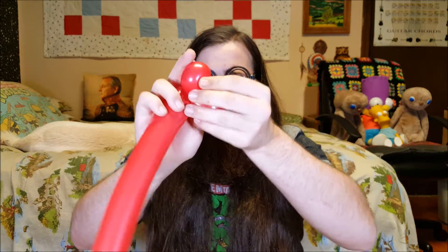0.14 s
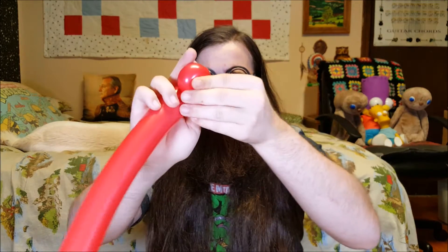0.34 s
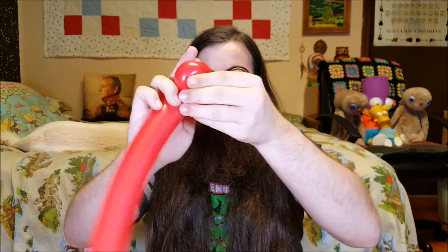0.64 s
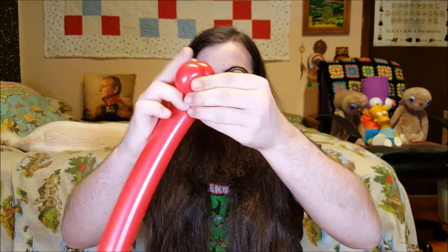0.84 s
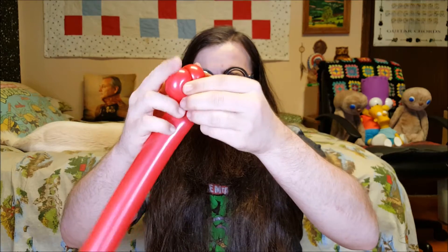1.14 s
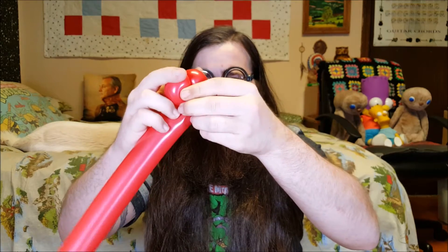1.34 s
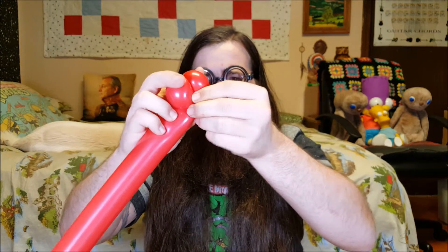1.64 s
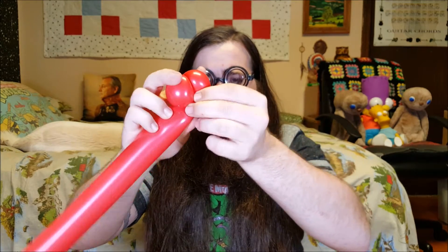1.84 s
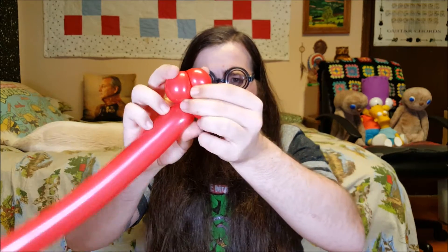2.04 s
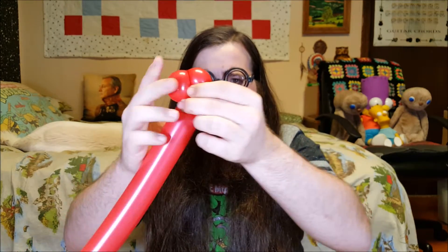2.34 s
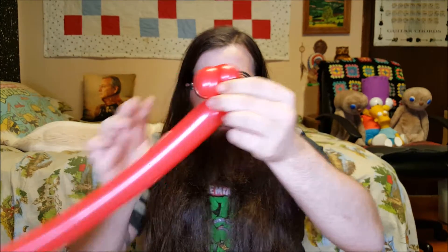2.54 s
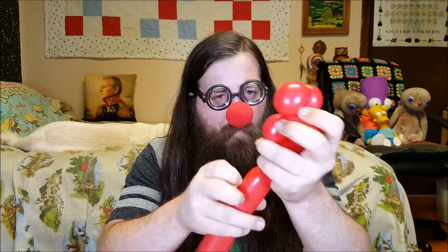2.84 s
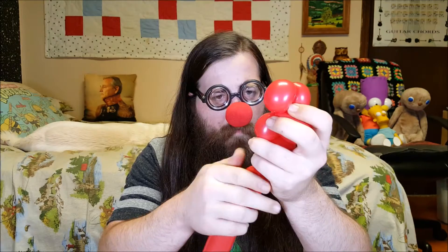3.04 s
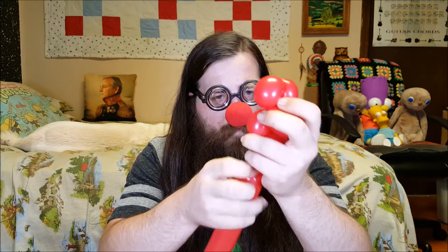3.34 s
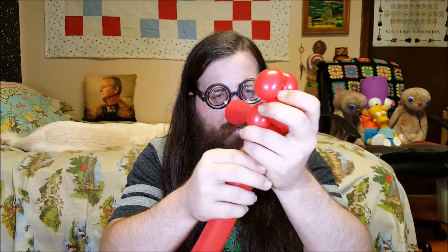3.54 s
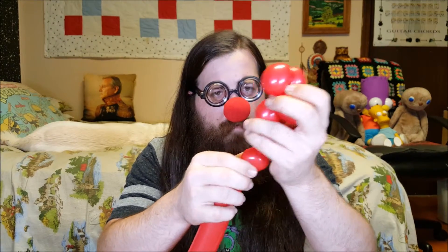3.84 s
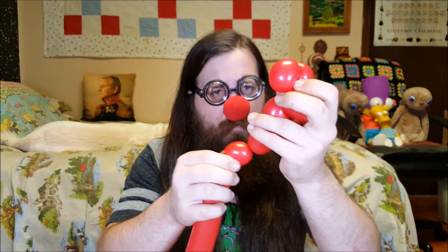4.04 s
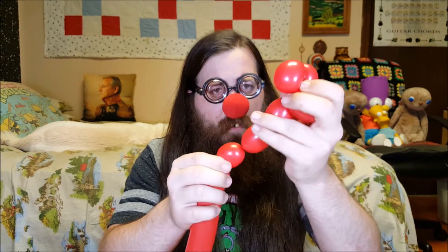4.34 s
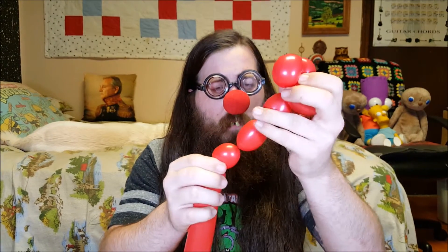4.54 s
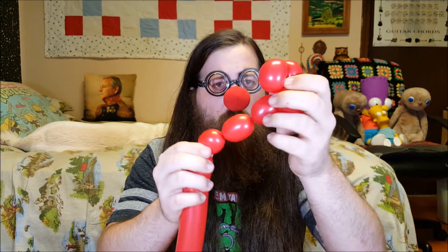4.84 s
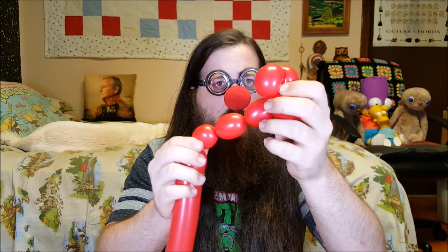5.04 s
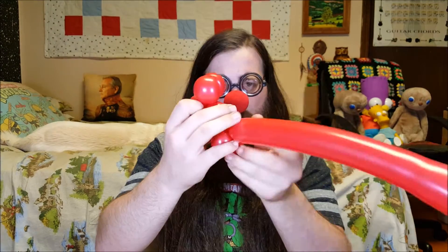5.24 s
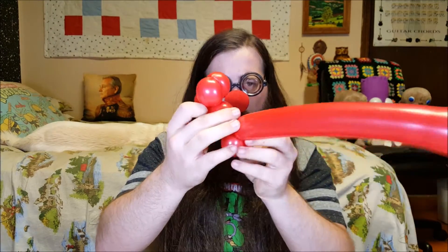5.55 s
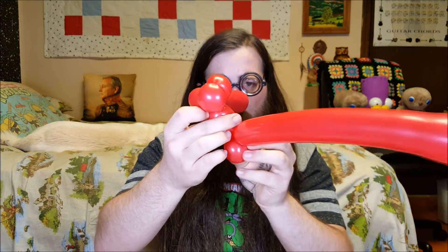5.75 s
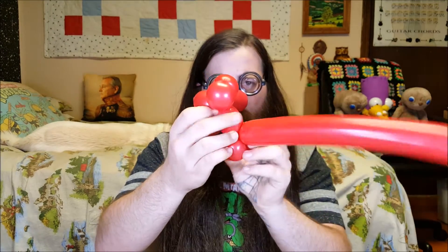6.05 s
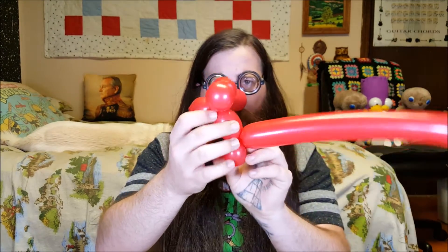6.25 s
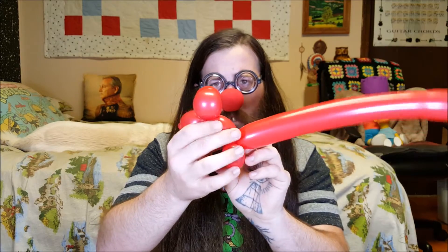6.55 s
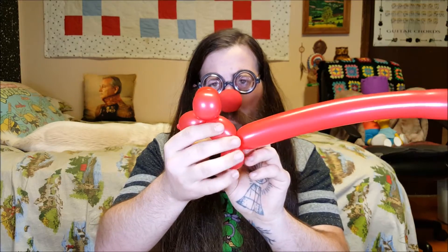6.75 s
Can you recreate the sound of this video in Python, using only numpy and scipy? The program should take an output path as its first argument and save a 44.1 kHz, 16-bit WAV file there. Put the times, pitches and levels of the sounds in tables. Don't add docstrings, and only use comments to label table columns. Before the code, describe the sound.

Close stereo sound of hands twisting a long inflated balloon in a small, soft-furnished room. Grainy rubber rubbing and creaks come in short strokes, dotted with sharp clicks. A loud hollow pop lands before two seconds, then the hands nearly fall silent. Quick clusters of snaps follow as more sections are twisted, then lighter squeaky rubs and ticks as they are folded together.

```python
import sys
import numpy as np
from scipy import signal
from scipy.fft import rfft, irfft
from scipy.io import wavfile
from scipy.ndimage import uniform_filter1d

SR = 44100
rng = np.random.default_rng(int(sys.argv[2]) if len(sys.argv) > 2 else 0)


def invert_db(level):
    return 10 ** (np.asarray(level, dtype=float) / 20)


def to_wav(sig):
    pcm = np.clip(np.atleast_2d(sig), -1, 1) * 32767
    pcm = np.round(pcm).astype(np.int16)
    wavfile.write(sys.argv[1], SR, pcm.T)


N = 303408

# frequency_hz, density_db
AIR = [(18, -39.5), (30, -31.5), (43, -38), (118, -14), (134, 4.5), (1280, -17), (1670, -31),
       (16000, -23.5)]
AIR_DB = -74
# frequency_hz, t60_s
ROOM_T60 = [(250, 0.2), (4000, 0.24), (11000, 0.16)]
ROOM_DB = -8
# frequency_hz, likeness (0 to 1)
LIKENESS = [(100, 1), (1500, 0.8), (4000, 0.38), (12000, 0.029)]
# time_s, delay_samples
RIGHT_LATE = [
    (2.4, 4),
    (2.7, 0),
]

# start_s, level_db, pitch_hz
THUMPS = [(0.514, -52, 320), (4.846, -54, 282), (4.768, -54, 290), (4.79, -55, 290), (4.82, -55, 290),
          (4.962, -54, 290), (1.805, -53, 488), (1.819, -49, 503), (2.107, -41, 393), (2.212, -46, 280),
          (2.281, -49.5, 156), (2.851, -42.5, 326), (3.406, -44, 450), (3.465, -42.5, 470),
          (3.506, -39.5, 437), (3.967, -41.5, 400), (3.994, -42.5, 378), (4.027, -47, 380),
          (4.103, -45.5, 370), (4.237, -43.5, 393), (4.419, -48, 221), (4.442, -48, 200), (4.556, -45, 192),
          (4.586, -48.5, 188), (5.488, -39, 354), (6.081, -48, 475), (6.109, -47, 356), (6.519, -53, 337),
          (6.754, -41, 432), (6.7745, -38, 463), (6.806, -41, 480)]
# start_s, level_db, pitch_hz, t60_s
RINGS = [(.048, -42, 870, .3), (1.65, -46, 3300, .1), (3.176, -46, 1000, .1), (3.68, -42, 780, .2),
         (3.735, -41, 760, .2), (4.38, -52, 800, .2), (4.79, -50, 720, .25), (4.846, -50, 720, .22),
         (4.846, -54, 1480, .12), (5.571, -47, 3900, .1), (6.522, -38, 2600, .1), (6.64, -39, 900, .06)]

# peak_s, level_db, swell_s (per 10 dB), pocket_hz
NOSE_ROLLS = [(0.074, -42, 0.11, 855), (.17, -48, 0.18, 1060), (.25, -46.5, 0.06, 1550),
              (.418, -42.5, 0.19, 1120), (0.52, -37, 0.01, 780), (.66, -45.5, 0.3, 1900),
              (.81, -47, 0.05, 1000), (.85, -35, 0.06, 1000), (1.05, -56.5, 1, 1570),
              (1.12, -48, -0.07, 840), (1.27, -53.5, .1, 800), (1.405, -47.5, 0.05, 2020),
              (1.491, -49, 0.18, 1630), (1.61, -39.5, .08, 1005), (1.8, -38, 0.0541, 890),
              (2.159, -45, 0.2268, 1120), (2.215, -42, 0.04, 1510), (2.36, -46, 0.02, 2170),
              (2.5, -50, 0.1, 1500)]
LINK_ROLLS = [(2.91, -45, 0.04, 1003), (3.05, -55, .02, 520), (3.09, -46.5, 0.036, 1450),
              (3.32, -49.5, 0.2, 520), (3.6, -49, 0.075, 600), (3.685, -40.5, .03, 803),
              (3.745, -37.5, 0.047, 1800), (3.9, -50.5, .15, 950), (4.157, -48, 0.064, 1200),
              (4.23, -48.5, 0.031, 770), (4.41, -55, 0.056, 780), (4.48, -54.5, 0.085, 1300),
              (5.017, -43, 0.034, 1100)]
FOLD_ROLLS = [(5.21, -45.5, .04, 2000), (5.33, -47, 0.06, 1210), (5.46, -47, .08, 900),
              (5.595, -50, 0.14, 740), (5.9, -49, 0.12, 930), (6.018, -42.5, 0.064, 1990),
              (6.169, -48.5, .06, 1800), (6.28, -54.5, 0.043, 900), (6.411, -60, .06, 2400),
              (6.64, -54, .05, 1486), (6.735, -44, 0.032, 1870), (6.872, -37.5, 0.014, 2440)]
# start_s, level_db, fade_s (per 10 dB), pocket_hz
GRABS = [(0, -39.5, 0.21, 900), (1.84, -43, 0.2, 900), (2.055, -43.5, 0, 1616), (2.285, -48, -0.1, 1500),
         (2.85, -42, 0.1, 600), (3.406, -47, 0.09, 1370), (4.769, -49.5, 0.92, 740),
         (6.084, -41, 0.09, 1200), (6.525, -53, 0.16, 2600), (.615, -46, .1, 1700), (.766, -44, .08, 800),
         (1.367, -49, .1, 2600), (3.061, -51, .06, 1300), (3.166, -42.5, .07, 980), (5.152, -48, .1, 900),
         (5.272, -44.5, .05, 450), (5.378, -44, .04, 870), (5.571, -47, .06, 800), (6.71, -46, .1, 620),
         (6.851, -46, .1, 1050)]
FADE_PER_SWELL = 0.86
GRAB_S, RESTING_DB = 0.0059, -82
# start_s, length_s, loss_db
PAUSES = [
    (0.451, 0.16, 7.5),
    (1.416, 0.06, 4.5),
    (2.41, .439, 17.5),
    (4.26, 0.13, 9),
    (4.594, 0.17, 6),
    (4.855, .11, 31),
    (5.066, 0.077, 11),
    (5.21, .06, 4),
]
LIFT_S = 0.029
# time_s, bass_db (at a medium stroke)
SLACK = [(0, -25), (.3, -42), (.7, -7), (.92, -5), (1, -14), (1.5, -18.5), (2.05, -6.5), (2.7, -26),
         (2.9, -2), (3.15, -17.5), (3.3, -4), (3.7, -24.5), (4.2, -3.5), (4.6, -26), (5.2, -7),
         (5.75, -8.5), (6.4, -13), (6.88, -16)]
MEDIUM_DB, GRIP_DAMPS = -46, 0.6
# time_s, treble_db
NEAR = [
    (0, -9.5),
    (2.7, -6),
    (3, -10),
    (4.2, -7.5),
    (4.6, -10.5),
    (5.5, -9),
    (6.88, -14.5),
]
# frequency_hz, gain_db (per Hz)
SKIN = [(260, -39.5), (450, -61), (911, 10), (1240, -10), (1620, 5), (2600, 8.5), (5000, -9), (6500, -50),
        (11000, -120)]

# start_s, ring_db, pocket_hz, crack_db (re ring)
NOSE_TWIST = [(0.0185, -50, 1010, 0), (0.1187, -34, 1170, 3), (0.1724, -28.5, 1680, -3),
              (0.2247, -36, 1720, -24), (0.2487, -33, 1035, -2), (0.342, -29, 1450, -20),
              (0.4402, -37.5, 1610, 8), (0.5722, -37, 2220, -8), (0.661, -31.5, 1700, 2),
              (0.768, -36, 770, 6), (0.8194, -34.5, 460, 6), (0.9237, -30, 1670, -20),
              (0.9319, -29.5, 1730, -8), (1.0601, -37, 810, -3), (1.0998, -31.5, 664, -8),
              (1.1599, -41, 553, 10), (1.2232, -40.5, 2870, -1), (1.2928, -44.5, 760, 7)]
EAR_TWIST = [(1.4749, -32.5, 1655, -19), (1.5605, -35.5, 1710, 0), (1.6011, -35, 2720, 4),
             (1.6073, -36.5, 1690, 6), (1.6502, -24, 2970, -11.5), (1.754, -30, 853, 4.5),
             (1.8009, -42, 844, -13), (1.8081, -11.5, 873, -11), (1.8241, -18, 843, -6),
             (1.8498, -27.5, 2970, 4), (1.9107, -37, 1760, -11), (1.9401, -38.5, 428, 7),
             (1.9573, -37.5, 447, 9.5), (1.971, -31, 1700, -2), (1.9825, -37.5, 1200, 6.5),
             (2.0039, -42, 840, 12.5), (2.0516, -31, 2770, -0.5), (2.0668, -29, 2750, -4),
             (2.0967, -30, 810, -25), (2.108, -36, 566, -5), (2.1494, -27.5, 2210, 6.5),
             (2.2848, -32.5, 557, 11.5), (2.5811, -60.5, 1160, 10.5), (2.6904, -61, 1920, 11)]
NECK_TWISTS = [(2.8499, -36, 1100, -26), (3.4093, -30, 2680, -4), (3.414, -29, 1370, -3),
               (3.4467, -39, 1220, -6), (3.466, -39, 1410, -7.5), (3.4991, -22, 1447, -21),
               (3.5551, -33.5, 1265, -15.5), (3.5925, -31.5, 1680, -20), (3.6694, -25, 3150, -24),
               (3.6801, -22, 1670, -7), (3.721, -31, 1700, -14.5), (3.734, -26.5, 1690, -8),
               (3.746, -22.5, 2584, -10), (3.7564, -24.5, 1780, -17), (3.8858, -26.5, 2593, -17.5),
               (3.9681, -28, 1343, -12), (3.9949, -28.5, 1270, -18), (4.0274, -28.5, 1204, -18),
               (4.1063, -30, 1154, -24), (4.1193, -44.5, 1130, 16), (4.1555, -29, 1140, -26),
               (4.1997, -39, 770, -4), (4.2567, -38, 395, -12.5)]
LINK_TWISTS = [(4.4017, -41.5, 1830, -17), (4.4155, -21, 1425, -8), (4.4433, -34, 1330, -5),
               (4.557, -27, 1290, -22), (4.5888, -33, 1287, -8), (4.7524, -61, 2090, 6),
               (4.7684, -34.5, 1395, -12), (4.782, -33.5, 1350, -1), (4.8059, -35.5, 1386, -3),
               (4.82, -33.5, 1420, 2.5), (4.8343, -37.5, 1390, -4), (4.8461, -34.5, 723, 4),
               (4.9613, -38.5, 1356, 3), (4.984, -45, 1400, 8), (5.005, -34, 1700, -41),
               (5.1255, -44, 2940, 9), (5.3181, -38, 2850, -11), (5.3332, -34, 2960, -14),
               (5.4311, -29, 926, -12), (5.4373, -27.5, 875, -26), (5.4815, -27.5, 913, -24),
               (5.489, -29, 996, -16), (5.5156, -24.5, 3440, 1.5), (5.595, -30.5, 3170, -1.5),]
FOLD = [ (5.6717, -39, 1810, -3), (5.7074, -42, 1760, -2), (5.7642, -30, 1920, -4.5),
        (5.833, -33, 1900, -7.5), (5.869, -35, 1930, -12), (5.916, -35.5, 1830, -19),
        (5.9274, -35.5, 1840, -10), (6.0114, -30, 1440, -10), (6.0205, -32, 1460, -12),
        (6.0823, -27.5, 636, -1.5), (6.1101, -28, 660, 1), (6.3262, -50.5, 394, -3),
        (6.4124, -46.5, 1490, 7), (6.4625, -51, 1310, 0), (6.4982, -40.5, 2450, -8),
        (6.522, -29, 2515, -10), (6.622, -47, 2800, -18), (6.6389, -30, 2050, -4), (6.71, -35.5, 1850, -13),
        (6.721, -32, 1470, -28.5), (6.7744, -27, 1515, -28), (6.8059, -28, 1686, -52),
        (6.8645, -33.5, 920, -15)]
# start_s, ring_db, pocket_hz, crack_db (re ring)
MORE_SLIPS = [(.132, -35, 900, -12), (.186, -38, 1200, -8), (.199, -37, 1500, -8), (.236, -34, 1700, -8),
              (.27, -35, 1500, -8), (.335, -37, 1200, -12), (.528, -39, 2200, -8), (.617, -36, 1640, -8),
              (.638, -36, 1600, -8), (.678, -37, 2000, -8), (.712, -32, 1570, -6), (.838, -30, 1100, -2),
              (.843, -31, 900, -4), (.849, -31, 2100, -4), (.876, -33, 1300, -4), (.941, -36, 1900, -10),
              (1.035, -40, 872, -6), (1.193, -44, 805, 0), (1.451, -42, 1180, -10), (1.495, -40, 1800, -10),
              (1.511, -38, 900, -14), (1.744, -38, 1600, -10), (2.086, -33, 900, -8), (2.207, -31, 1990, -4),
              (2.215, -32, 1500, -6), (2.245, -37, 1800, -14), (2.384, -38, 2100, -14), (2.523, -57, 800, -4),
              (2.568, -58, 1780, -4)]
LATER_SLIPS = [(2.675, -59, 1900, 2), (3.141, -43, 912, -10), (3.363, -46, 1920, -6),
               (3.692, -30, 2400, -10), (3.766, -29, 2200, -12), (3.944, -42, 1500, -8),
               (4.178, -40, 700, -6), (4.213, -38, 750, -6), (4.226, -39, 700, -6), (4.241, -39, 720, -4),
               (4.545, -48, 2000, -4), (5.017, -33, 1100, -14), (5.25, -44, 450, -6), (5.382, -38, 869, -6),
               (5.62, -38, 1900, 0), (5.816, -43, 719, -6), (5.899, -39, 1740, -10), (6.141, -35, 2520, -8),
               (6.274, -48, 1840, -6), (6.358, -51, 861, -4), (6.592, -49, 2330, -6),
               (6.754, -37, 2500, -14), (6.851, -36, 1070, -8), (6.876, -33, 2500, -8)]
SLIPS = NOSE_TWIST + EAR_TWIST + NECK_TWISTS + LINK_TWISTS + FOLD + MORE_SLIPS + LATER_SLIPS
WALL_HZ = (750, 1400, 2500)
WALL_DB_PER_OCTAVE = 2.0


def at_hz(points, hz):
    table_hz, values = np.array(points).T
    return np.interp(np.log(hz), np.log(table_hz), values)


def at_time(points):
    return np.interp(np.arange(N) / SR, *np.transpose(points))


def rms_one(x):
    return x / np.sqrt(np.mean(x ** 2) + 1e-20)


def band(x, low_hz, high_hz):
    edges = [low_hz, min(high_hz, 0.45 * SR)]
    return signal.sosfilt(signal.butter(2, edges, "band", fs=SR, output="sos"), x)


def high_pass(order, hz):
    return signal.butter(order, hz, "high", fs=SR, output="sos")


def ring(clicks, hz, cycles):
    r = invert_db(-60 * hz / cycles / SR)
    w = 2 * np.pi * hz / SR
    return signal.lfilter([0, np.sin(w)], [1, -2 * r * np.cos(w), r * r], clicks + 1e-18)


def spread(mid, side, hz):
    alike = np.clip(at_hz(LIKENESS, hz), 0, 1)
    return (np.sqrt(1 + alike) * mid + np.sqrt(1 - alike) * side * [[1], [-1]]) / np.sqrt(2)


def drift(rate):
    steps = rng.standard_normal(800)
    return np.interp(np.arange(N) / SR * rate, np.arange(len(steps)), steps)


def room_tone():
    hz = np.maximum(np.fft.rfftfreq(N, 1 / SR), 1)
    white = rng.standard_normal((2, N)) + 0.31 * rng.standard_normal(N)
    return invert_db(AIR_DB) * rms_one(irfft(rfft(white) * invert_db(at_hz(AIR, hz)), N))


def walls():
    t = np.arange(SR // 2) / SR
    answer = 0
    for hz in 125 * 2.0 ** np.arange(8):
        mid, side = band(rng.standard_normal((2, len(t))), hz / np.sqrt(2), hz * np.sqrt(2))
        answer = answer + spread(mid, side, 2.7 * hz) * invert_db(-60 * t / at_hz(ROOM_T60, hz))
    answer = answer * np.clip((t - 0.003) / 0.0013, 0, 1)
    return answer / np.sqrt(np.sum(answer ** 2) / 2)


def room(x):
    place = np.arange(N) / SR * 5 % 4
    mono = x.mean(axis=0)[None]
    echo = 0
    for k in range(4):
        distance = np.abs((place - k + 2) % 4 - 2)
        share = np.cos(np.pi / 2 * np.clip(distance, 0, 1))
        echo = echo + signal.oaconvolve(mono * share, walls(), axes=1)[:, :N]
    return echo


def thumps():
    out, t = np.zeros(N), np.arange(2500) / SR
    for s, level_db, hz in THUMPS:
        envelope = np.exp(-t * hz / 1.17) * (1 - np.exp(-t / 0.00093))
        out[round(s * SR):][:len(t)] += invert_db(level_db + 8) * np.sin(2 * np.pi * hz * t) * envelope
    return out


def rings():
    out, t = np.zeros(N), np.arange(8000) / SR
    for s, level_db, hz, t60 in RINGS:
        waver = 1 + 0.7 * np.interp(t * 150, np.arange(40), rng.standard_normal(40))
        envelope = invert_db(level_db - 60 * t / t60) * (1 - np.exp(-t / 0.002))
        out[round(s * SR):][:len(t)] += envelope * waver * np.sin(2 * np.pi * hz * t)
    return out


def lifted_db(t):
    loss = 0
    for s, length, loss_db in PAUSES:
        loss = loss + loss_db * np.clip((t - s) / LIFT_S, 0, 1) * (t < s + length)
    return loss


def strokes():
    t = np.arange(0, N, 32) / SR
    rolls = [(s, db, w, w * FADE_PER_SWELL, hz) for s, db, w, hz in NOSE_ROLLS + LINK_ROLLS + FOLD_ROLLS]
    grabs = [(s, db, GRAB_S, w, hz) for s, db, w, hz in GRABS]
    s, db, swell, fade, hz = np.transpose(rolls + grabs)[:, :, None]
    each_db = db - 10 * np.maximum((s - t) / np.abs(swell), (t - s) / np.abs(fade))
    power = np.sum(invert_db(each_db) ** 2, axis=0) + invert_db(RESTING_DB) ** 2
    level_db = 10 * np.log10(power) - lifted_db(t)
    pocket_hz = uniform_filter1d(hz[np.argmax(each_db, axis=0), 0], size=12)
    return np.interp(np.arange(N) / SR, t, level_db), np.repeat(pocket_hz, 32)[:N]


def grains(per_s, spread_db):
    sizes = invert_db(spread_db * np.minimum(rng.exponential(1, N), 4)) * rng.choice([-1, 1], N)
    return sizes * (rng.random(N) < per_s / SR)


def chatter():
    turns = np.cumsum(80 * invert_db(3.5 * drift(rate=27)) / SR)
    lets_go = np.diff(np.floor(turns), prepend=0) * invert_db(3 * drift(rate=90))
    return 0.5 + 0.25 * signal.lfilter([1], [1, -np.exp(-1 / (0.0054 * SR))], lets_go)


def moving_pocket(rain, hz, width_hz):
    turn = np.exp(2j * np.pi * np.cumsum(hz) / SR)
    r = np.exp(-np.pi * width_hz / SR)
    smooth = signal.lfilter([1], [1, -r], rain / turn)
    smooth = signal.lfilter([1], [1, -r], smooth)
    return np.real(turn * smooth)


def rubbing():
    level_db, pocket_hz = strokes()
    treble_db = at_time(NEAR)
    bass_db = np.minimum(at_time(SLACK) - GRIP_DAMPS * (level_db - MEDIUM_DB), 3)
    rain = chatter() * np.array([grains(4500, spread_db=2.8) for side in range(2)])

    dealt = rng.integers(0, 15, N)
    wall = 0
    for k, hz in enumerate(np.geomspace(430, 5200, 15)):
        patch = ring(rain * ((dealt == k) + 0.3), hz, cycles=12)
        wall = wall + invert_db(at_hz(SKIN, hz) + 1.5 * drift(rate=40)) * hz * spread(*patch, hz)
    pocket = rms_one(spread(*moving_pocket(rain, pocket_hz, width_hz=750), 800))
    wall = band(rms_one(wall) + 0.42 * pocket, 330, 9000)

    bass = 0
    for hz in (190, 270, 370):
        bass = bass + invert_db(3 * drift(rate=14)) * spread(*band(rain, hz, hz * 1.45), hz)
    hiss = spread(*band(rain, 4600, 10000), 7000)
    hiss = hiss + 0.67 * spread(*band(rain[::-1], 8000, 14200), 14000)

    sway_db = 0.61 * level_db + 0.32 * bass_db + 0.5 * treble_db - 30
    sway = invert_db(sway_db) * rms_one(spread(*band(rain, 80, 190), 124))
    rub = wall + invert_db(bass_db) * rms_one(bass) + invert_db(treble_db) * rms_one(hiss)
    return sway + invert_db(level_db + 2.2 * drift(rate=52) - 2.3) * rub


def slips():
    pocket, wall, crack = np.zeros(N), np.zeros((3, 2, N)), np.zeros((2, N))
    t = np.arange(2000) / SR
    crack_shape = np.exp(-t / 0.00029) + 0.3 * np.exp(-t / 0.0051)
    for s, ring_db, hz, crack_db in SLIPS:
        noise = rng.standard_normal((4, len(t)))
        i = round(s * SR)
        n = min(len(t), N - i)
        waver = uniform_filter1d(noise[3], size=50)
        swing = np.exp(-(t * hz / 1.77) ** 2) + 1.88 * waver * np.exp(-t / 0.0083)
        note = np.sin(2 * np.pi * hz * t) * swing * (1 - np.exp(-t / 0.00026))
        pocket[i:i + n] += invert_db(ring_db) * note[:n]
        octaves_off = np.abs(np.log2(hz / np.array(WALL_HZ)))
        wall_gain = invert_db(ring_db + 4.3 - WALL_DB_PER_OCTAVE * octaves_off)[:, None, None]
        wall[..., i:i + n] += wall_gain * (noise[:2] * np.exp(-t / 0.0029))[:, :n]
        crack[:, i:i + n] += invert_db(ring_db + crack_db - 0.4) * (noise[2:] * crack_shape)[:, :n]
    out = band(pocket, 330, 9000)
    for patch, hz, sign in zip(wall, WALL_HZ, (1, -1, 1)):
        out = out + sign * spread(*band(patch, hz / 1.36, hz * 1.36), hz)
    return out + spread(*band(crack, 2400, 11600), 8000)


def scene():
    balloon = thumps() + rings() + rubbing() + slips()
    late = at_time(RIGHT_LATE)
    balloon[1] = np.interp(np.arange(N) - late, np.arange(N), balloon[1])
    return room_tone() + invert_db(ROOM_DB) * room(balloon) + balloon


def roll_off(x):
    return signal.sosfilt(signal.butter(12, 16700, fs=SR, output="sos"), x)


def record(dry):
    treble = signal.sosfilt(high_pass(1, 9000), dry)
    x = dry + treble * [[0.25], [-0.15]]
    x = signal.sosfilt(high_pass(3, 95), x)
    x = x + invert_db(-82.5) * rms_one(band(rng.standard_normal((2, N)), 23, 70.7))
    x = x - 0.93 * signal.sosfiltfilt(high_pass(12, 16050), x)
    x = x - 0.00027
    return roll_off(x)


dry = scene()
out = record(dry)
to_wav(out)
```